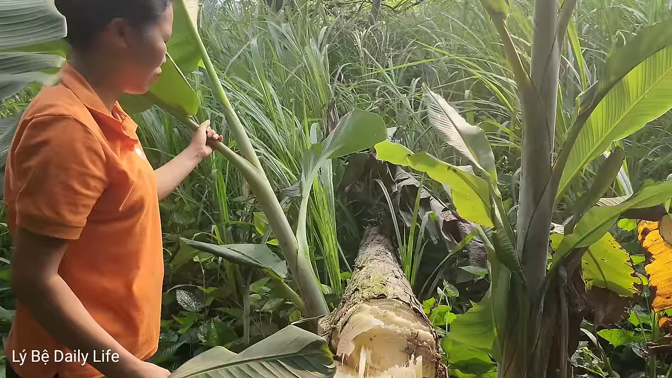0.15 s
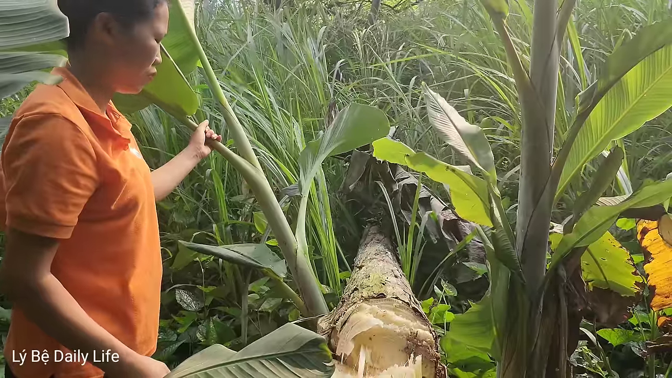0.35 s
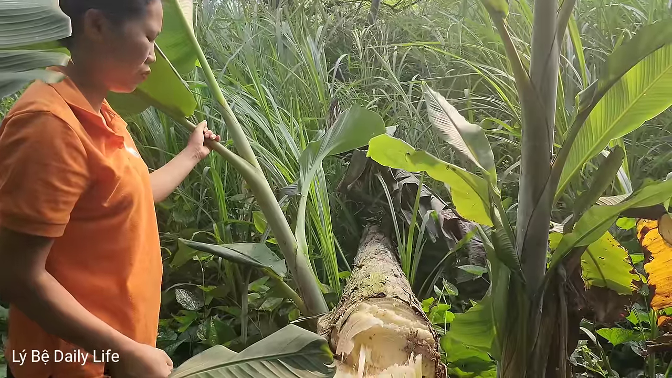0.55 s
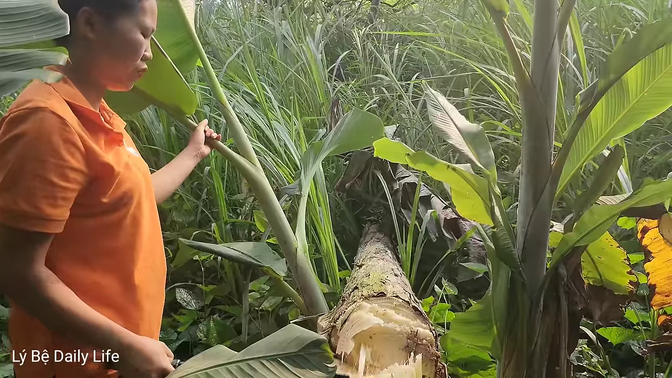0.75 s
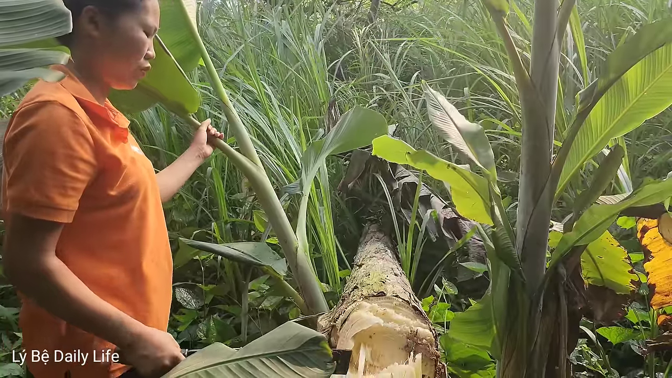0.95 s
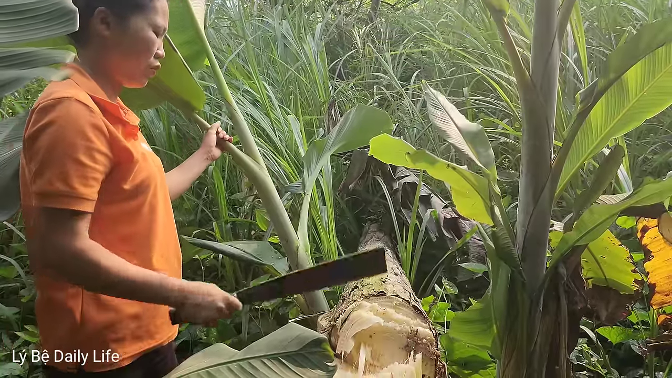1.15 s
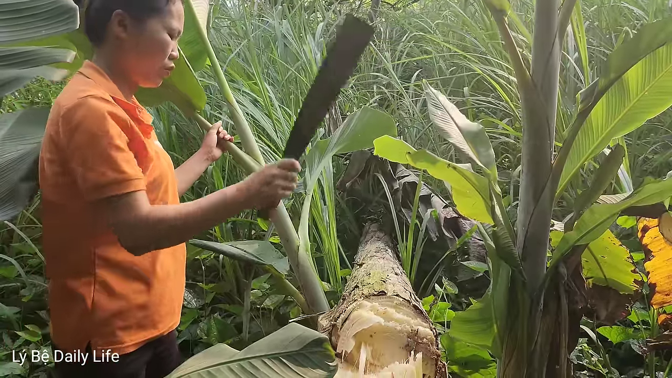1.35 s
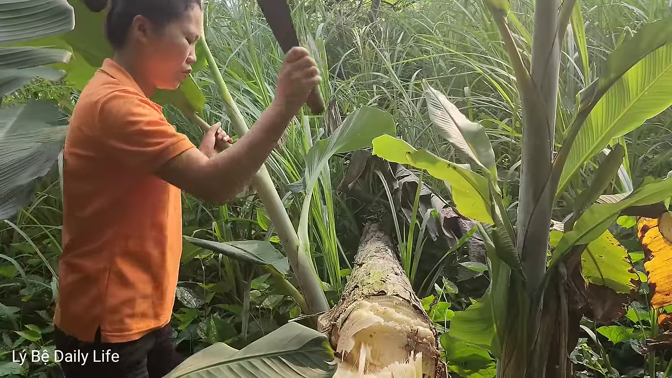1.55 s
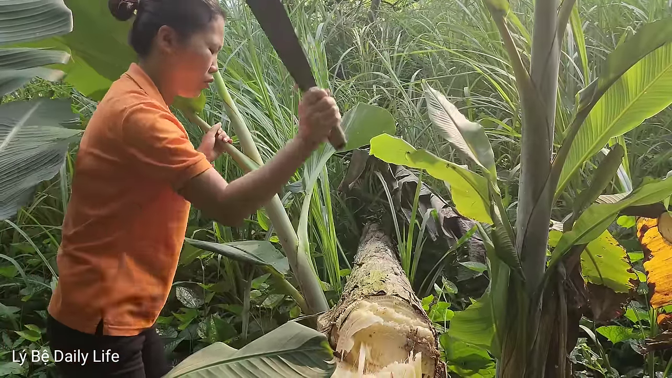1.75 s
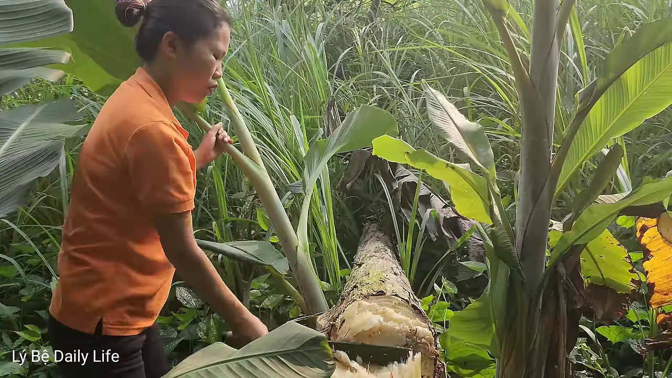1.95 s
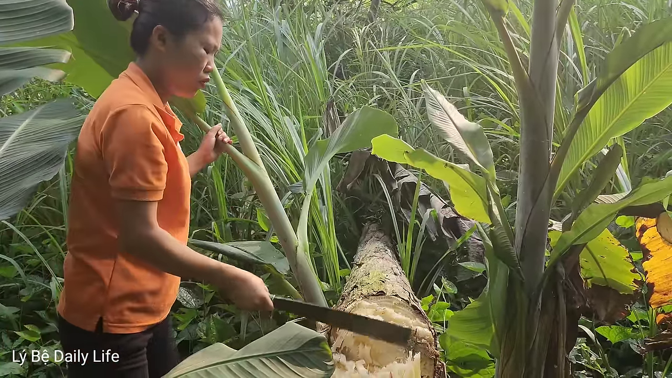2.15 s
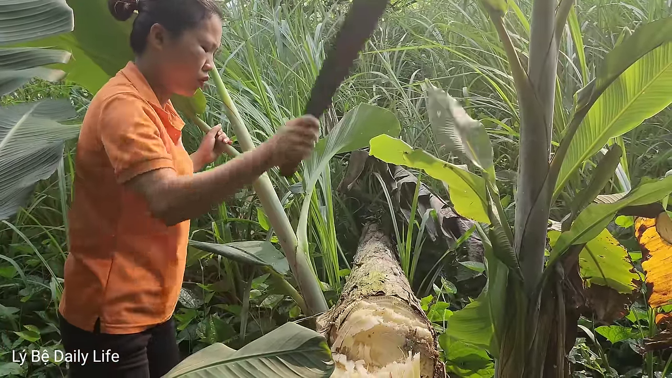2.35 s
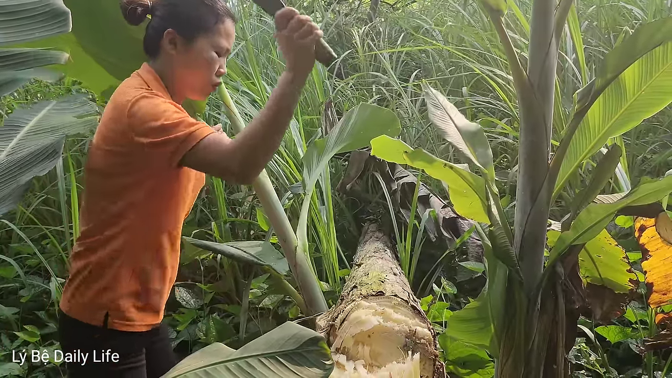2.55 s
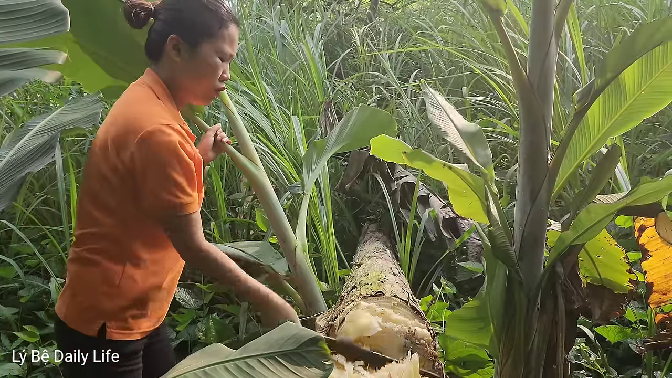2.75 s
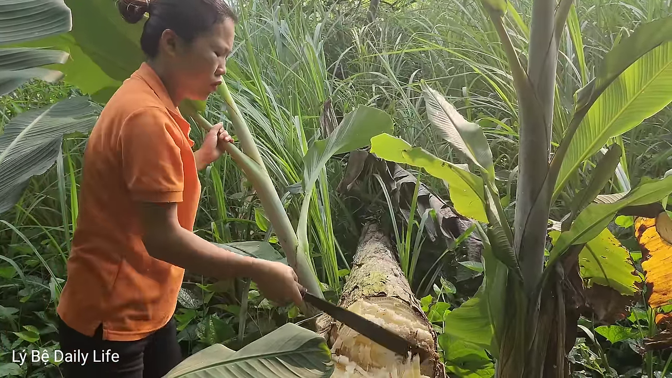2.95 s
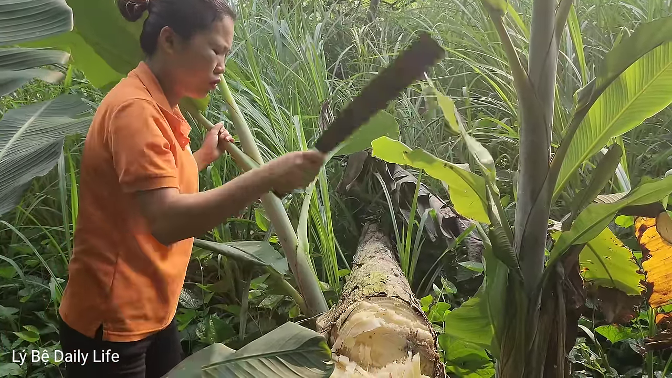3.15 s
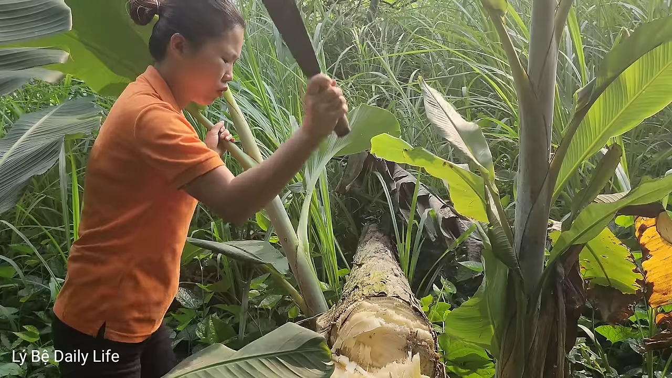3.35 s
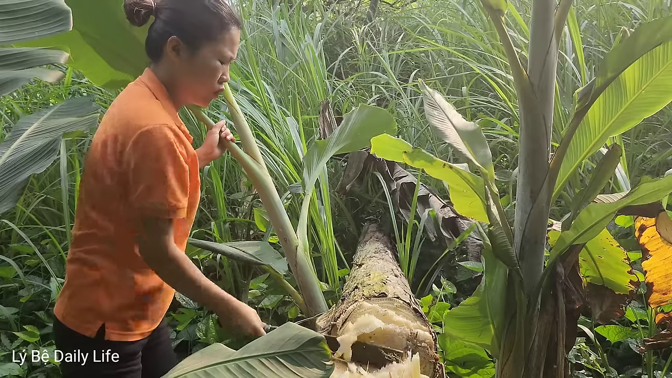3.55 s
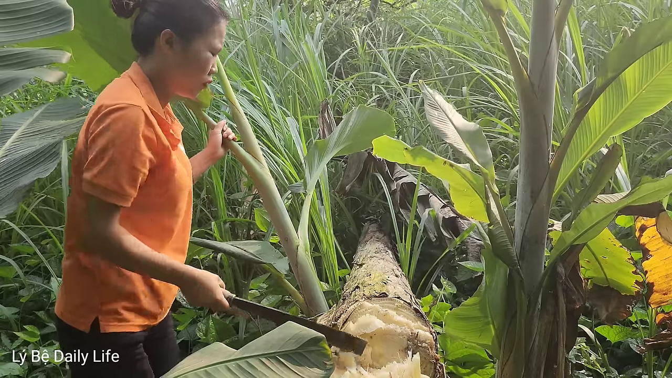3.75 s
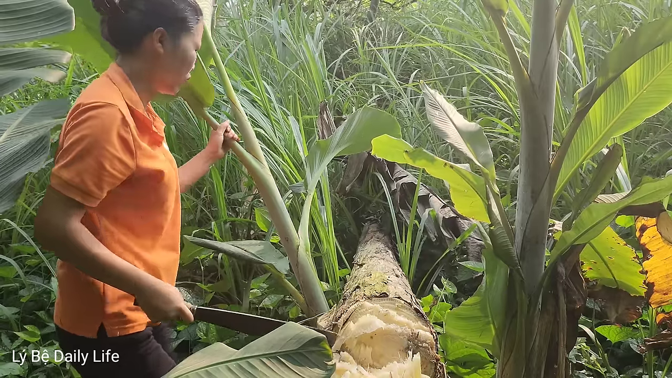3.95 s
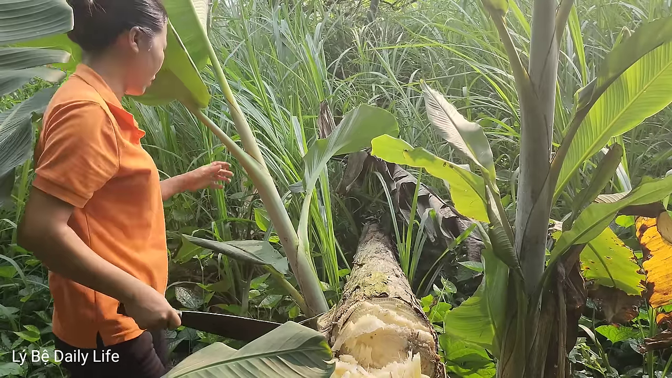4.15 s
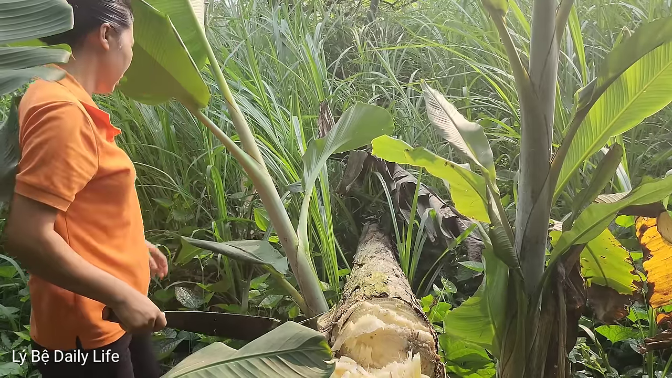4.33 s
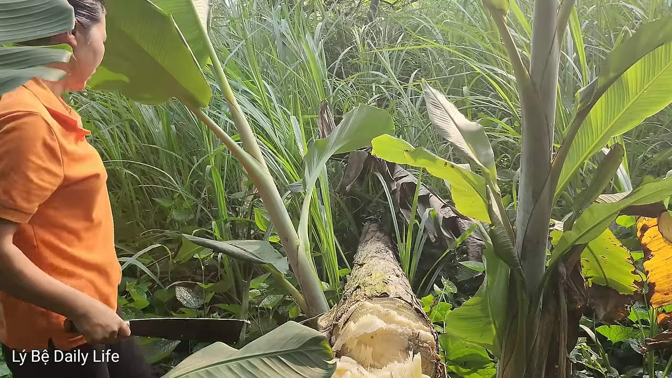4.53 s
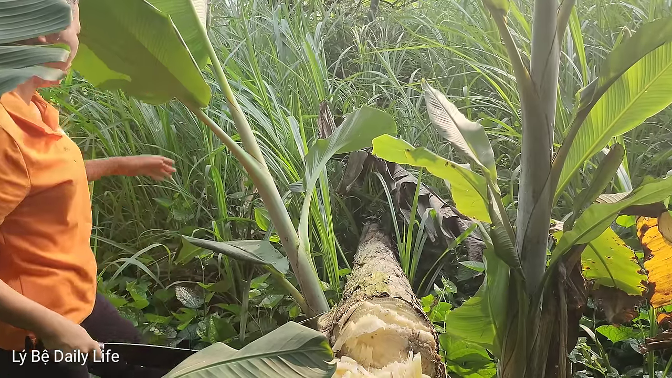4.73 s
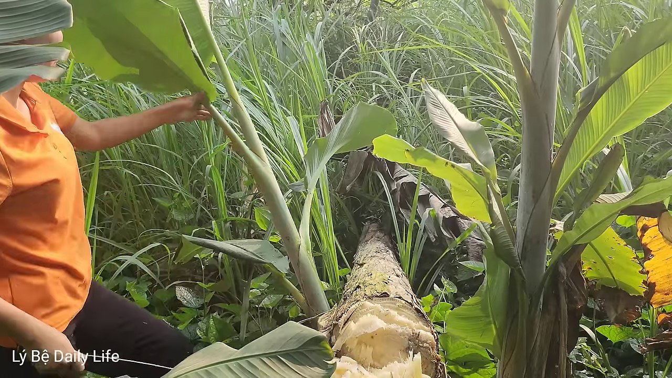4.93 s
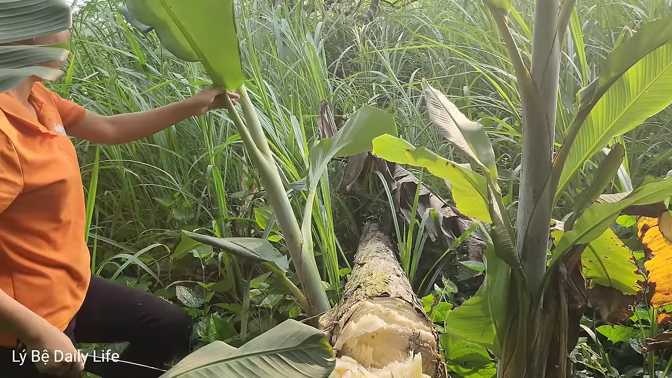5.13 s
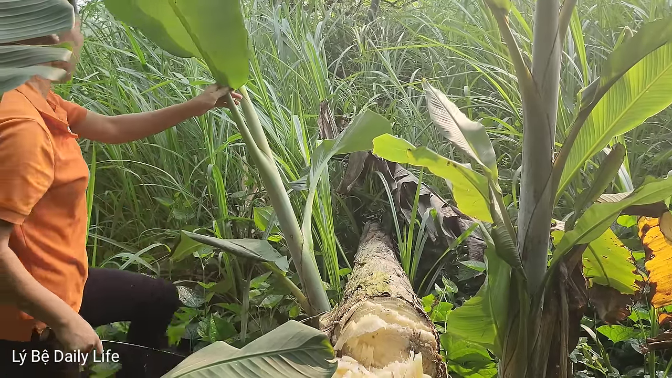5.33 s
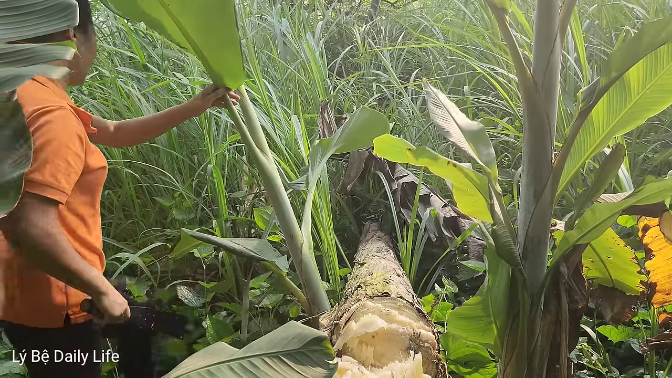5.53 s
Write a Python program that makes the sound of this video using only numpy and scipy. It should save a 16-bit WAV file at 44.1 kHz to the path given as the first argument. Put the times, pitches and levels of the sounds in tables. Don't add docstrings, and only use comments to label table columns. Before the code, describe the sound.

Outdoors in a leafy garden, a distant bird repeats a high gliding whistle over soft air and faint insect hum. After about two seconds a machete chops a soft wet trunk three times, each a crackling crunch with a knock and low thump. Wet chips drop after each chop, leaves rustle and feet shift. A stereo camera microphone stands a short way off.

```python
import sys
import numpy as np
from scipy import signal
from scipy.fft import rfft, irfft, next_fast_len
from scipy.io import wavfile
from scipy.ndimage import uniform_filter1d

SR = 44100
rng = np.random.default_rng(int(sys.argv[2]) if len(sys.argv) > 2 else 0)


def wav_record(signal):
    frames = np.transpose(np.atleast_2d(signal))
    bounded = np.clip(frames, -1, 1)
    quanta = np.round(bounded * 32767).astype(np.int16)
    wavfile.write(sys.argv[1], SR, quanta)


def ratio_of_db(decibels):
    return 10 ** (np.asarray(decibels, float) / 20)


N = 250929

# f/Hz, density/dB per Hz
GARDEN_AIR = [(12, -29.5), (22, -1), (49, 1.5), (95, -5.5), (190, -16), (330, -19), (490, -8), (740, -5.5),
              (1000, -13), (2500, -17.5), (3300, -7), (4300, -6.5), (16000, -31)]
# f/Hz, share
FAR_LIKENESS = [(60, 0.68), (180, 0.91), (550, 0.64), (1650, -0.16), (4970, 0.035), (15000, -0.13)]
# f/Hz, share
NEAR_LIKENESS = [(200, 0.95), (1000, 0.78), (3000, 0.31), (6000, 0.089), (15000, 0.1)]
# t/s, length/s, start f/Hz, end f/Hz, level/dB
FAINT_TONES = [
    (.92, .12, 385, 345, -65),
    (1.05, .25, 1050, 1100, -63),
    (2.45, .15, 3500, 3550, -66),
    (2.52, .14, 3250, 3150, -67),
    (2.65, .12, 4400, 4380, -60),
    (2.94, .16, 3900, 3880, -57),
    (3.17, .12, 5030, 5050, -63),
    (5.22, .13, 340, 375, -54),
]
# stage, share of crest pitch, level/dB
WHISTLE_SHAPE = [
    (0, .95, -20),
    (.5, .835, -12),
    (1.12, .785, -7),
    (1.25, .835, -5),
    (1.55, .9, -5),
    (1.68, .94, -1),
    (2.15, 1.003, -1),
    (3.0, .985, -3),
    (4.0, .62, -10),
]
# t/s, level/dB, hook length/s, rise/s, crest f/Hz
BIRD_CALLS = [
    (0.349, -49, 0.074, 0.072, 4360),
    (0.977, -47.5, 0.062, 0.071, 4469),
    (1.639, -47.5, 0.053, 0.075, 4424),
    (2.698, -51.5, 0.069, 0.082, 4335),
    (3.305, -48.5, 0.05, 0.09, 4374),
    (4.008, -50.5, 0.051, .083, 4335),
    (4.711, -48, 0.054, 0.086, 4350),
    (5.386, -47, 0.069, 0.064, 4422),
]
# f/Hz, width/Hz, level/dB
INSECT_LINES = [(6950, 25, -3), (7080, 25, -5), (7500, 20, -3), (8060, 15, 0), (8650, 20, -1),
                (8780, 20, -1), (9200, 20, -2)]
# t/s, level/dB, body resonance f/Hz
NEAR_HUM = [(0, -76, 8315), (.5, -71.5, 8415), (1.2, -70, 8220), (1.7, -70.5, 8210), (2.2, -70.5, 7860),
            (2.7, -77.5, 8040), (3.4, -82.5, 7710), (4.2, -81.5, 7500), (5.69, -80.5, 7440)]
# t/s, pitch factor
WINGBEAT_DRIFT = [(0, .999), (.9, 1.003), (1.6, 1.016), (2.1, 1.035), (2.7, 1.062), (3.2, 1.07),
                  (5.69, 1.075)]
# t/s, level/dB
FAR_CHORUS = [(0, -67), (1.2, -82), (2.3, -70), (3.3, -71.5), (4, -66.5), (4.7, -68.5), (5.2, -72),
              (5.69, -74)]
# f/Hz, density/dB per Hz
RUSTLE_COLOUR = [(1500, -17), (2500, -1.5), (5000, -1), (9000, -3.5), (12000, -5), (15500, -10.5)]
# f/Hz, density/dB per Hz
FLAP_COLOUR = [(400, -21.5), (650, 2.5), (1000, -2), (1500, -0.5), (2400, -4), (4000, -26)]
# f/Hz, density/dB per Hz
FOOT_COLOUR = [(50, -15), (110, -3.5), (240, -8), (380, -3.5), (550, -11.5)]
# peak t/s, flap/dB, rise/dB per s, fall/dB per s, dry rustle over the flap/dB
MOVES_AT = [(0.0, -62, 50, 6.5, -2.5), (1.2, -71.5, 25, 9.5, -3.5), (2.0, -63.5, 79.5, 51, 3),
            (2.941, -58.5, 57.5, 78, -7.5), (3.601, -63, 131.5, 34, -8.5), (3.8, -71, 41.5, 34, 1.5),
            (4.0, -69.5, 25, 50, -2), (4.301, -66, 13, 25, -5.5), (4.94, -60, 51.5, 52, -1),
            (5.2, -67.5, 21, 20, -4), (5.56, -56.5, 40, 11, -4)]
# peak t/s, level/dB, rise/dB per s, fall/dB per s
STEPS_AT = [
    (0.0, -74, 50, 28),
    (.27, -76, 60, 90),
    (.75, -75.5, 60, 57),
    (1.25, -74.5, 33, 32),
    (2.34, -73.5, 117, 70),
    (3.2, -65, 109, 119),
    (3.9, -73, 31.5, 50),
    (4.22, -67.5, 52.5, 41),
    (4.95, -70, 72, 10),
    (5.45, -69, 7, -12),
]
# t/s, level/dB, f/Hz, t60/s
TAPS_AT = [(.134, -44, 820, 0.051), (0.957, -49, 1000, 0.044), (2.004, -30.5, 1670, 0.019),
           (2.004, -31, 614, 0.04), (2.185, -48, 853, 0.039), (2.901, -40, 1300, 0.015),
           (3.143, -32, 660, 0.044), (3.591, -41, 1000, 0.024), (4.07, -51.5, 226, 0.069),
           (4.175, -38.5, 95, 0.091), (4.885, -51, 80, 0.17), (5.551, -45, 351, 0.053)]
# t/s, level/dB, f/Hz, t60/s, thud/dB
CHIPS_AT = [(.245, -52.5, 900, 0.21, -60), (.283, -50.5, 620, 0.1, -74), (.305, -48.5, 1400, 0.082, -80),
            (2.007, -42.5, 900, 0.063, -37), (2.318, -42.5, 1900, 0.062, -46.5),
            (2.321, -45, 700, 0.067, -56), (2.933, -44.5, 197, .15, -49), (3.142, -36, 1750, 0.048, -37),
            (3.161, -45.5, 693, 0.096, -44), (3.609, -40, 1338, 0.067, -39.5),
            (3.63, -41.5, 824, 0.064, -47), (4.166, -46.5, 730, 0.23, -35.5), (4.23, -51, 574, 0.29, -68.5),
            (4.971, -47.5, 226, 0.15, -63), (5.368, -50.5, 850, 0.44, -84), (5.41, -48.5, 1400, 0.082, -43),
            (5.634, -45, 342, 0.043, -55)]
# f/Hz, level/dB, t60/s
SLAB_MODES = [(95, -6, 0.108), (177, -7, 0.2), (250, 4.5, 0.039), (326, 1, 0.054), (413, -21, 0.022)]
# f/Hz, level/dB, t60/s
BLADE_MODES = [(5000, -11, .15), (6000, -14, .12), (7100, -6, .05), (8183, -8, .16), (9394, -2, .17),
               (9964, -14, .1), (12010, -2, .13), (13940, -13, .06)]
# t/s, level/dB
BLADE_KNOCKS = [
    (2.939, -47.5),
    (3.145, -67),
    (3.609, -68),
]
# t/s of the blade stopping, crackle/dB, cutting time/s, spray under crackle/dB, thump/dB
CHOP_BLOWS = [
    (1.952, -13, 0.022, -18, -20),
    (2.789, -12, 0.0096, -16.5, -17),
    (3.542, -18, 0.015, -16, -16.5),
]
# t/s, level/dB, contact/ms
SHEATH_JOLTS = [
    [(1.9405, -28, .3), (1.945, -20, .3), (1.9505, -12.5, .25), (1.9518, -7.5, .3), (1.9535, -11, 2.5),
     (1.958, -16, 2.1), (1.963, -24.5, 1.3)],
    [(2.7845, -34, 0.35), (2.787, -5, .3), (2.789, -3, 0.5), (2.7903, -2.5, 0.79), (2.792, -1.5, 0.4),
     (2.7944, -9, 2.2), (2.799, -9, 1)],
    [(3.5345, -20, 0.43), (3.5365, -6, 0.22), (3.539, -3, 0.18), (3.5404, -9, 0.53), (3.5426, 0, 1.32),
     (3.5505, -13, 1.6)],
]
# f/Hz, width/Hz, level/dB
NOTCH_MODES = [
    [(226, 60, -5.5), (586, 62, 4), (900, 18, 0), (1420, 110, -0.5), (1588, 290, -3.5), (2163, 59, -10),
     (2110, 110, -7.5)],
    [(235, 170, -14), (405, 7.96, -3), (620, 280, -3.5), (1090, 98, -0.5), (1510, 15, -5), (1700, 75, 2.5),
     (2060, 27, -12)],
    [(261.7, 360, -1), (800, 150, 2.5), (1000, 47, -9.5), (1350, 110, -5), (1500, 69, -15.5),
     (2098, 79, -16), (5600, 900, -22)],
]
# f/Hz, level/dB, t60/s
TRUNK_MODES = [(51.4, -4, 0.26), (71, -3, .22), (97, 2, 0.12)]
# f/Hz, density/dB per Hz
CRACKLE_COLOUR = [(180, -38.5), (300, -14.5), (737, -3), (1080, -17), (1780, -8.5), (3190, -17),
                  (3520, -13.5), (12100, -21.5), (14700, -22), (16000, -43)]
# f/Hz, density/dB per Hz
SPRAY_COLOUR = [(120, -34), (200, -13), (1210, -19.5), (2510, -21), (3370, -21.5), (6050, -25.5),
                (11900, -28), (14900, -28.5), (16000, -46)]
# f/Hz, width/Hz, share removed
GROUND_DIP = (491, 126, .7)


def unit_rms(x):
    return x / np.sqrt(np.mean(x ** 2) + 1e-20)


def log_points(points):
    f, value = np.transpose(points)
    return np.log(f + 1), value


def read(points, hz):
    return np.interp(np.log(hz + 1), *log_points(points))


def curve(rows):
    s, *columns = np.transpose(rows)
    return [np.interp(np.arange(N) / SR, s, column) for column in columns]


def add(mix, s, sound):
    part = mix[..., max(round(s * SR), 0):][..., :sound.shape[-1]]
    part += sound[..., :part.shape[-1]]


def stereo(colour, likeness, drive):
    length = drive.shape[1]
    size = next_fast_len(length, True)
    hz = np.fft.rfftfreq(size, 1 / SR)
    colour_db = np.interp(np.log(hz + 1), *log_points(colour), -90, -90)
    left, other = rfft(drive, size) * ratio_of_db(colour_db)
    same = np.clip(read(likeness, hz), -1, 1)
    right = same * left + np.sqrt(1 - same ** 2) * other
    return unit_rms(irfft([left, right], size)[:, :length])


def grains(count, spread_db):
    size_db = spread_db * np.minimum(rng.exponential(1, count), 4)
    return rng.standard_normal((2, count)) * ratio_of_db(size_db)


def ring(modes, seconds):
    t = np.arange(round(seconds * SR)) / SR
    return -sum(ratio_of_db(db - 60 * t / max(t60, 1e-3)) * np.sin(2 * np.pi * hz * t) for hz, db, t60 in modes)


def fuzzy_tone(hz, width, steady):
    knots = np.arange(0, N + SR, SR / width)
    a, b, c, d = (np.interp(np.arange(N), knots, row) for row in rng.standard_normal((4, len(knots))))
    phase = 2 * np.pi * np.cumsum(hz) / SR
    in_step = (np.array([a, b]) + steady) * np.cos(phase)
    return unit_rms(in_step + np.array([c, d]) * np.sin(phase))


def swells(rows, rest_db):
    t, power = np.arange(N) / SR, ratio_of_db(rest_db) ** 2
    for s, db, rise, fall in rows:
        power = power + ratio_of_db(db + np.minimum(rise * (t - s), -fall * (t - s))) ** 2
    return np.sqrt(power)


def trees(dry):
    t = np.arange(SR // 2) / SR
    echoes = rng.standard_normal((2, len(t))) * (rng.random((2, len(t))) < 1500 / SR)
    echoes *= ratio_of_db(-60 * t / .32) + ratio_of_db(-13 - 60 * t / 1.2)
    echoes /= np.linalg.norm(echoes, axis=1, keepdims=True)
    return signal.fftconvolve(dry[None], echoes, axes=1)


def garden():
    return ratio_of_db(-59.5 - 5.5) * stereo(GARDEN_AIR, FAR_LIKENESS, rng.standard_normal((2, N)))


def faint():
    out = np.zeros((2, N))
    for s, length, from_hz, to_hz, db in FAINT_TONES:
        hz = np.linspace(from_hz, to_hz, round(length * SR))
        tone = np.hanning(len(hz)) * np.sin(2 * np.pi * np.cumsum(hz) / SR)
        add(out, s, trees(ratio_of_db(db) * tone))
    return out


def bird():
    crest_s, fall_s = .05, .21
    break_stages, break_width, break_db = (1.18, 1.58), .12, -15
    out = np.zeros((2, N))
    stage, share, level_db = np.transpose(WHISTLE_SHAPE)
    t = np.arange(SR // 2) / SR
    for at, db, hook, rise, crest_hz in BIRD_CALLS:
        now = np.interp(t, np.cumsum([0, hook, rise, crest_s, fall_s]), range(5))
        now = np.where(now > 3, 4 - (4 - now) ** 1.45, now)
        hz = uniform_filter1d(np.interp(now, stage, share), 200) * crest_hz
        breaks_db = sum(break_db * np.clip(1 - abs(now - b) / break_width, 0, 1) for b in break_stages)
        flutter_db = 2.5 * unit_rms(uniform_filter1d(rng.standard_normal(len(t)), 300))
        ending = np.clip((4 - now) / .06, 0, 1)
        gain = ending * ratio_of_db(db + np.interp(now, stage, level_db) + breaks_db + flutter_db)
        call = gain * np.sin(2 * np.pi * np.cumsum(hz) / SR)
        smeared = trees(call)
        add(out, at, ratio_of_db(-6) * call)
        add(out, at, ratio_of_db(3) * smeared)
        add(out, at + .055, ratio_of_db(-7) * smeared[::-1])
    return out * ratio_of_db([[-1.1], [1.1]])


def insects():
    near_db, centre_hz = curve(NEAR_HUM)
    factor = curve(WINGBEAT_DRIFT)[0]
    near = np.zeros((2, N))
    for hz, width, level in INSECT_LINES:
        line_hz = hz * factor
        line_db = level - 6 * ((line_hz - centre_hz) / 900) ** 2
        near += ratio_of_db(line_db) * fuzzy_tone(line_hz, 2 * width, steady=.8)
    far = ratio_of_db(curve(FAR_CHORUS)[0]) * fuzzy_tone(centre_hz - 100, 900, steady=0)
    return ratio_of_db(near_db - 2.5) * near + far


def leaves():
    clumps = ratio_of_db(2.0 * unit_rms(uniform_filter1d(rng.standard_normal(N), 500)))
    dry_moves = [(s, db + dry_db, 1.5 * rise, 1.83 * fall) for s, db, rise, fall, dry_db in MOVES_AT]
    dry_gain = swells(dry_moves, rest_db=-82)
    flap_gain = swells([row[:4] for row in MOVES_AT], rest_db=-78.5)
    shudders = [(s + 0.026, thump_db - 31.5, 400, 180) for s, *_, thump_db in CHOP_BLOWS]
    foot_gain = swells(STEPS_AT + shudders, rest_db=-100)
    rustle = ratio_of_db(9.5) * dry_gain * stereo(RUSTLE_COLOUR, FAR_LIKENESS, grains(N, 0.96)) * clumps
    flap = ratio_of_db(2.5) * flap_gain * stereo(FLAP_COLOUR, FAR_LIKENESS, grains(N, 1.4))
    foot = ratio_of_db(2.5) * foot_gain * stereo(FOOT_COLOUR, FAR_LIKENESS, grains(N, 2.4))
    return rustle + flap + foot


def small_hit(db, hz, t60, hiss_db, thud_db, core_db):
    t = np.arange(SR // 4) / SR
    start = np.clip(t / (.0007 + .001 * max(-db - 40, 0)), 0, 1)
    around = [(hz / 3, -30), (hz / 2.4, -7), (hz, 0), (hz * 1.46, -6), (hz * 10.0, -28)]
    dull = ratio_of_db(db - 60 * t / t60) * stereo(around, NEAR_LIKENESS, grains(len(t), 0.75))
    core = ring([(hz, core_db, t60)], .25)
    hiss = ratio_of_db(hiss_db - 60 * t / (t60 * 1.24)) * stereo(RUSTLE_COLOUR, NEAR_LIKENESS, grains(len(t), 3.0))
    thud = ratio_of_db(thud_db) * ring(SLAB_MODES, .25) / 2
    return start * (dull + core + hiss + thud)


def taps():
    out = np.zeros((2, N))
    for s, db, hz, t60 in TAPS_AT:
        add(out, s, small_hit(db, hz, t60, hiss_db=db - 16, thud_db=db - 30, core_db=db - 1))
    return out


def chips():
    out = np.zeros((2, N))
    for s, db, hz, t60, thud_db in CHIPS_AT:
        add(out, s, small_hit(db, hz, t60, hiss_db=db - 3, thud_db=thud_db, core_db=-120))
    return out


def blade():
    out = np.zeros((2, N))
    for s, db in BLADE_KNOCKS:
        add(out, s, ratio_of_db(db) * ring(BLADE_MODES, .4))
    return out


def chops():
    out, lead = np.zeros((2, N)), .04
    t = np.arange(SR // 2) / SR - lead
    for (s, db, cut, spray_db, thump_db), jolts, notch in zip(CHOP_BLOWS, SHEATH_JOLTS, NOTCH_MODES):
        swell = np.where(t < 0, np.clip(1 + t / cut, 0, 1) ** 1.9, np.exp(-t / 0.0065))
        add(out, s - lead, ratio_of_db(db) * swell * stereo(CRACKLE_COLOUR, NEAR_LIKENESS, grains(len(t), 3.0)))
        spray = np.clip(t / 0.012, 0, 1) * ratio_of_db(db + spray_db - 60 * t / .23)
        add(out, s - lead, spray * stereo(SPRAY_COLOUR, NEAR_LIKENESS, grains(len(t), 2.5)))
        body = ring([(hz, level, 1.9 / (width + 70)) for hz, width, level in notch], .15)
        for at, jolt_db, ms in jolts:
            knock = np.convolve(body, np.hanning(round(ms * SR / 1000) + 3))
            add(out, at, ratio_of_db(jolt_db) * knock / abs(knock).max())
        push = np.hanning(round(0.0076 * SR))
        thump = np.convolve(ring(TRUNK_MODES, .45), push)
        add(out, s + 0.0024, ratio_of_db(thump_db) * thump / abs(thump).max())
    return out


def scene():
    bass_edge = signal.butter(5, 60, "high", fs=SR, output="sos")
    hits = signal.sosfilt(bass_edge, taps() + chips() + chops())
    return garden() + faint() + bird() + insects() + leaves() + blade() + hits


def top_cut(x):
    return signal.sosfilt(signal.butter(12, 16660, fs=SR, output="sos"), x)


def record(dry):
    dip_hz, width, share = GROUND_DIP
    dipped = dry - share * signal.lfilter(*signal.iirpeak(dip_hz, dip_hz / width, SR), dry)
    size = next_fast_len(N, True)
    hz = np.fft.rfftfreq(size, 1 / SR)
    tilt_db = read([(500, 0.059), (1200, 0.43), (3000, 0.57), (12000, 0.91)], hz)
    ports = irfft(rfft(dipped, size) * ratio_of_db([-tilt_db, tilt_db]), size)[:, :N]
    return top_cut(1.5 * np.tanh(ports / 1.5))


dry = scene()
out = record(dry)
wav_record(out)
```